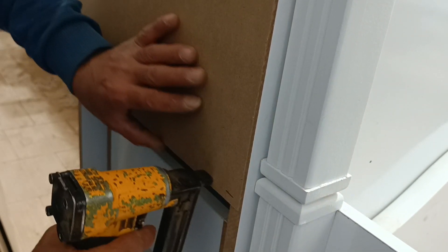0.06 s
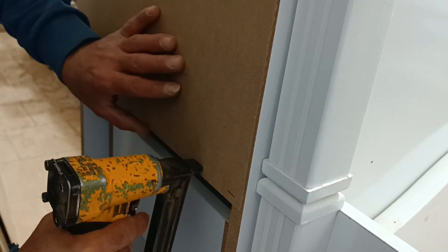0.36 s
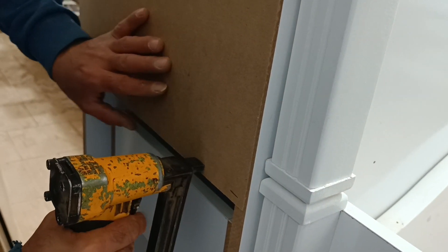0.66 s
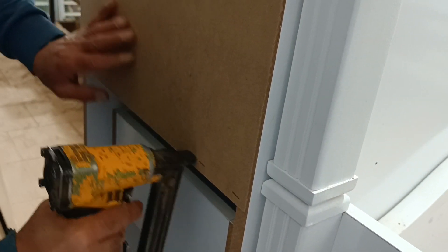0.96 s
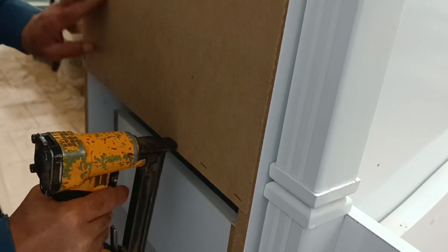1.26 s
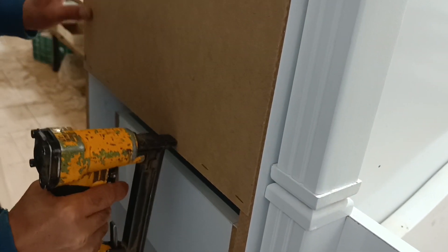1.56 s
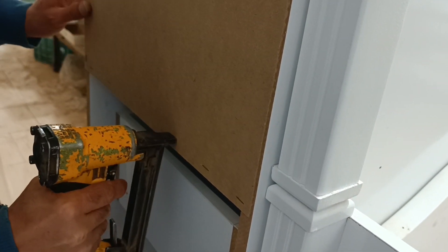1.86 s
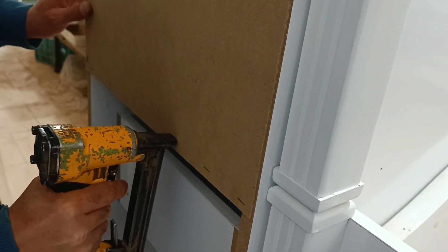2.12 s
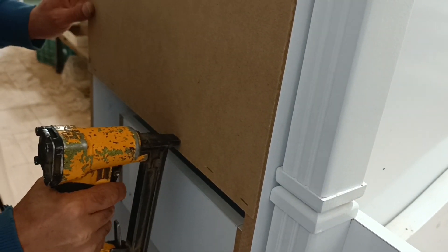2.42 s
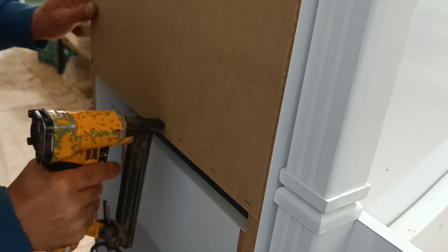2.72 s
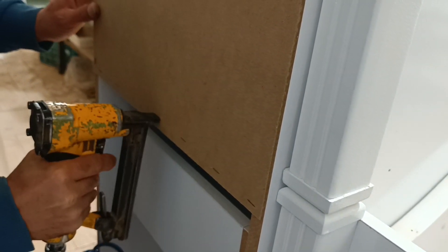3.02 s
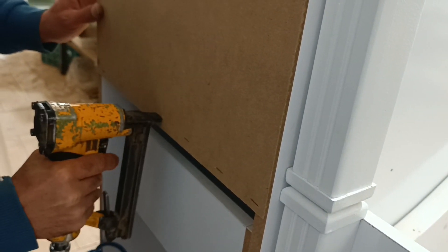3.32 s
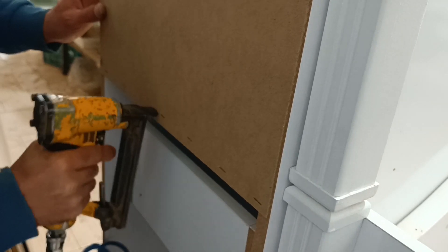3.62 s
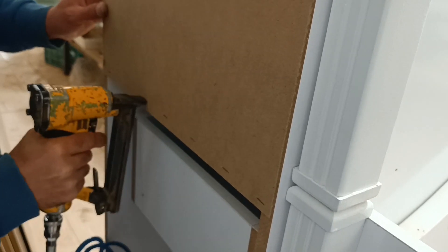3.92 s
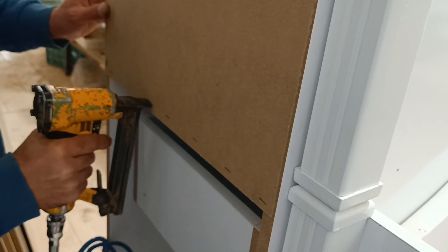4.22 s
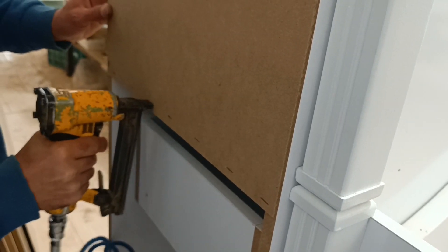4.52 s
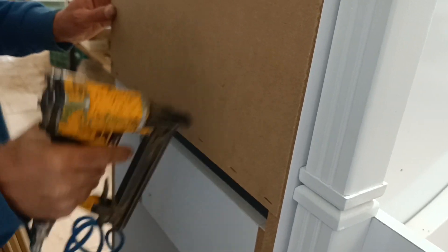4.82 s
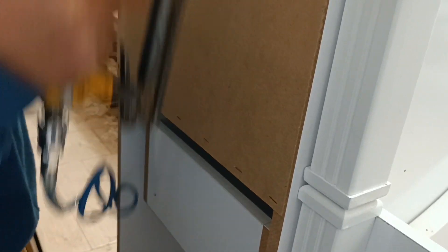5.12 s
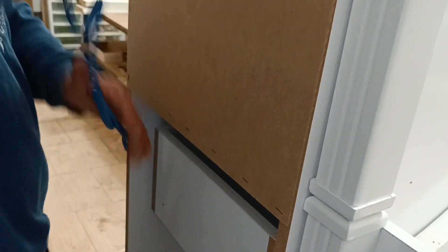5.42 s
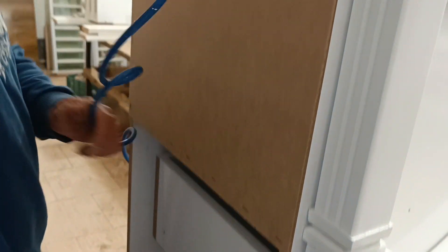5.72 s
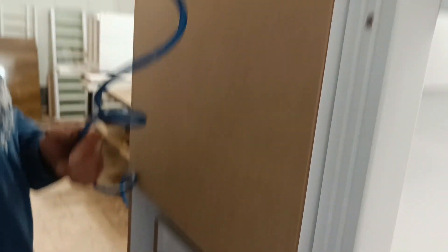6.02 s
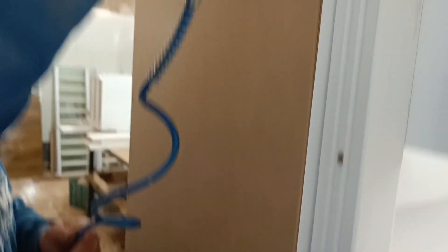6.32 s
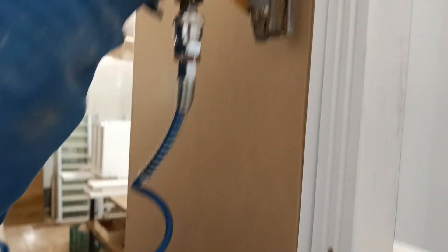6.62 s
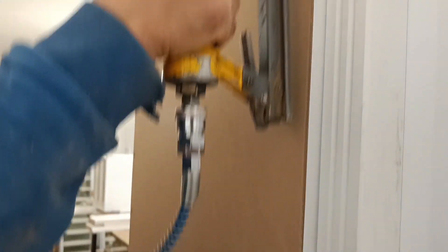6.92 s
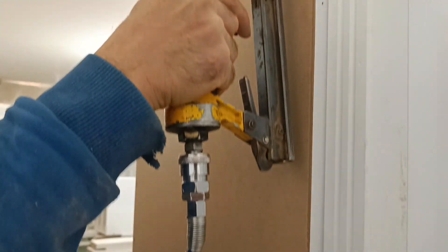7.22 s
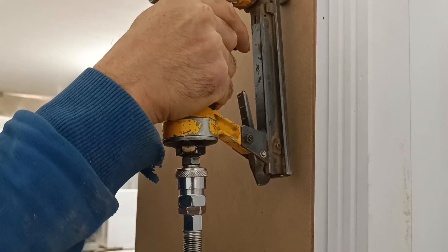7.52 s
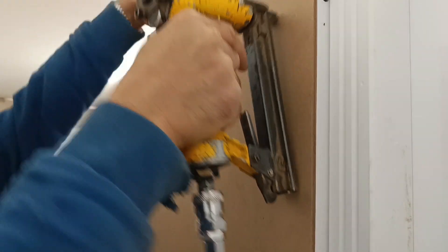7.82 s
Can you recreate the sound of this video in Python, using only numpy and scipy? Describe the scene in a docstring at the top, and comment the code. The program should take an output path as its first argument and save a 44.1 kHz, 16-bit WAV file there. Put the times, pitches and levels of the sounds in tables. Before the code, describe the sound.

Loud pneumatic staple shots with puffs of exhaust in a workshop, while a compressor hums, then cuts out with a long hiss.

```python
"""An air stapler fixes a thin back board to a cabinet: valve hiss, piston drive, strike, exhaust.
Behind it a piston compressor drones in the workshop, cuts out and blows off its line.
Palm and sleeve rub the board; the stapler clacks and bumps as it is moved and set down.
A limiter clamps on every shot, so the drone vanishes and swells back over half a second."""
import sys
import numpy as np
from scipy import signal
from scipy.fft import rfft, irfft, next_fast_len
from scipy.io import wavfile
from scipy.ndimage import uniform_filter1d, minimum_filter1d

SR = 44100
rng = np.random.default_rng(int(sys.argv[2]) if len(sys.argv) > 2 else 0)


def transcribe(signal):
    """Save signal, clipped to [-1, 1], as a 16-bit WAV file at the path in sys.argv[1]."""
    frames = np.atleast_2d(signal).T
    limited = np.clip(frames, -1, 1)
    pcm = np.round(limited * 32767).astype(np.int16)
    wavfile.write(sys.argv[1], SR, pcm)


N = 355446
TIME = np.arange(N) / SR

# board and cabinet modes: (frequency [Hz], level [dB], t60 [s])
BOARD_MODES = [(103, -9, .25), (152, 0, .2), (178, -8, .12), (237, -3, .14), (296, -4, .14), (355, -5, .13),
               (431, -10, .1), (560, -10, .1), (824, -14, .08)]
# likeness of the two microphone ports: (frequency [Hz], coherence [0..1])
PORT_COHERENCE = [(60, 0.99), (130, 1), (300, 1), (650, 0.41), (1400, 0.0054), (16000, 0.077)]


def amp(db):
    """Decibels to gain."""
    return 10 ** (np.asarray(db) / 20)


def unit_rms(x):
    """Scale to rms 1."""
    return x / np.sqrt(np.mean(x ** 2) + 1e-20)


def curve(points, hz):
    """Interpolate a table over log frequency."""
    f, value = np.transpose(points)
    return np.interp(np.log(hz + 1), np.log(f + 1), value)


def pan(db):
    """Constant-power gains for a left-minus-right level."""
    ratio = amp(np.atleast_1d(db))
    return np.array([ratio, np.ones_like(ratio)]) * np.sqrt(2 / (1 + ratio ** 2))


def add(mix, at_s, sound):
    """Mix in at at_s, cropped to the mix."""
    start = round(at_s * SR)
    sound = sound[:, max(-start, 0):]
    part = mix[:, max(start, 0):][:, :sound.shape[1]]
    part += sound[:, :part.shape[1]]


def noise(colour, size, low_pan_db=0, high_pan_db=0, right_lag_s=0.000375):
    """Coloured stereo noise, coherent in the bass."""
    padded = next_fast_len(size)
    hz = np.fft.rfftfreq(padded, 1 / SR)
    a, b = rfft(rng.standard_normal((2, padded)))
    coherence = curve(PORT_COHERENCE, hz)
    lag = np.exp(-2j * np.pi * hz * right_lag_s)
    pair = np.array([a, coherence * lag * a + np.sqrt(1 - coherence ** 2) * b])
    lean = pan(curve([(2000, low_pan_db), (6000, high_pan_db)], hz))
    return unit_rms(irfft(pair * lean * amp(curve(colour, hz)), padded)[:, :size])


def puff(t, hold_s, t60_s, rise_s=0.0005):
    """Envelope: ramps from t = 0, decays from hold_s."""
    return np.clip(t / rise_s, 0, 1) * amp(-60 * np.maximum(t - hold_s, 0) / t60_s)


def ring(modes, t, spread_rad, rise_s=0.00022):
    """Modes struck at t = 0, detuned per blow, phase scattered between ports."""
    out = 0
    for hz, db, t60_s in modes:
        detuned_hz = hz * rng.uniform(.994, 1.006)
        phase = 2 * np.pi * rng.random() + spread_rad * rng.standard_normal((2, 1))
        out += amp(db) * puff(t, 0, t60_s, rise_s) * np.sin(2 * np.pi * detuned_hz * t + phase)
    return out


def room(x, wet_db, taps_per_s=4000):
    """Add workshop echo: sparse reflections, decaying per band."""
    decay = [(100, 0.71), (400, 0.6), (1000, 0.81), (2200, 0.87), (4500, 0.55), (8000, 0.37), (15000, 0.15)]  # (frequency [Hz], t60 [s])
    tone = [(100, 15.5), (350, 8.5), (1000, -3.5), (2200, 1), (4000, 1.5), (7000, 4.5), (15000, 11)]  # (frequency [Hz], level [dB])
    taps = rng.choice([-1., 1.], (2, SR)) * (rng.random((2, SR)) < taps_per_s / SR)
    taps[:, :round(.005 * SR)] = 0
    hz, t, bands = signal.stft(taps, SR, nperseg=256)
    hz = hz[:, None]
    coherence = curve(PORT_COHERENCE, hz)
    bands[1] = coherence * bands[0] + np.sqrt(1 - coherence ** 2) * bands[1]
    bands *= amp(curve(tone, hz) - 60 * t / curve(decay, hz))
    response = signal.istft(bands, SR, nperseg=256)[1]
    response *= amp(wet_db) / np.linalg.norm(response[0])
    response[:, 0] += 1  # direct path
    return signal.fftconvolve(x, response, axes=1)


def workshop():
    """Steady, bass-heavy noise floor."""
    colour = [(20, -30), (48, -29), (70, 4.5), (100, -10.5), (160, -1.5), (260, -2), (430, -5.5), (720, -8),
              (1100, -9.5), (2000, -12.5), (5000, -23), (16000, -44.5)]  # (frequency [Hz], density [dB])
    return amp(-43) * noise(colour, N)


def intake_gain(hz, width_hz=4.16):
    """Stereo gain of the compressor intake's narrow resonances."""
    resonances = [(631, -49.5, -3), (664, -37.2, -3), (699, -38, 4), (719, -42.5, -1), (744, -37.8, -2),
                  (767, -33.5, 3), (778, -35.5, -1), (802, -38.5, 2), (826, -37, 7), (891, -41, 12),
                  (927, -49.5, 6), (985, -55, -3)]  # (frequency [Hz], level [dB], left-right [dB])
    power = 0
    for centre_hz, db, pan_db in resonances:
        power += (amp(db) * pan(pan_db)) ** 2 / (1 + (2 * (hz - centre_hz) / width_hz) ** 2)
    return np.sqrt(power)


def compressor(stroke_hz=11.449, throb_db=1.5, cut_out_s=4.28, coast_s=1.46):
    """Each piston stroke repeats one clatter and intake ring; all fades after cut-out."""
    # piston clatter, air rush: (frequency [Hz], density [dB])
    clatter_colour = [(25, -27), (48, -25), (70, -3.5), (110, -18.5), (160, 2), (220, -1), (340, -6),
                      (470, 1), (560, -30), (1100, -19.5), (1700, -9.5), (2300, -44)]
    rush_colour = [(40, -9), (200, -21), (500, -1), (1150, -16), (1700, 1.5), (2300, -3.5), (3900, -3),
                   (5000, -14.5), (6500, -41), (8200, -17), (10000, -39), (16000, -39)]
    size = 4096  # points per stroke
    turn = np.arange(size) / size
    hz = np.arange(size // 2 + 1) * stroke_hz
    # adjacent harmonics stay partly in phase: flutter at the stroke rate
    phase = np.cumsum(1.8 * rng.standard_normal(len(hz)))
    phase = phase + 0.58 * rng.standard_normal((2, len(hz)))
    intake = amp(1.87) * irfft(intake_gain(hz) * np.exp(1j * phase)) * size / np.sqrt(2)
    harmonics = amp(curve(clatter_colour, hz)) * rng.rayleigh(size=len(hz))
    harmonics *= (hz < 2500) * np.clip(hz / 95, 0, 1) ** 2
    clatter = unit_rms(irfft(harmonics * np.exp(1j * phase + 2j * np.pi * rng.random(len(hz)))))
    stroke = intake * amp(throb_db * np.cos(2 * np.pi * turn)) + amp(-40.5) * clatter
    machine = np.array([np.interp(stroke_hz * TIME, turn, side, period=1) for side in stroke])
    # turbulence rings the same resonances, so strokes differ
    padded = next_fast_len(N)
    air = rfft(noise(rush_colour, N), padded)
    turbulence = irfft(air * intake_gain(np.fft.rfftfreq(padded, 1 / SR)), padded)[:, :N]
    machine += amp(-42) * unit_rms(turbulence)
    # only the strongest intake ring lingers while coasting
    core = signal.sosfilt(signal.butter(2, [740, 830], "band", fs=SR, output="sos"), machine)
    coasting = np.clip((TIME - 4.5) / .2, 0, 1)
    machine = (1 - coasting) * machine + coasting * amp(-1) * core
    effort = np.clip(1 - (TIME - cut_out_s) / coast_s, 0, 1) ** 2.15
    return effort * (machine + amp(-40.5) * noise(rush_colour, N))


def blow_off(open_s=4.285, rise_s=0.086, bleed_db_per_s=2.5):
    """A valve vents the line; the hiss weakens as pressure falls."""
    colour = [(200, -12), (1200, -7.5), (2300, 0), (4000, 2.5), (5200, -2.5), (6500, -9), (8300, -4),
              (10000, -11.5), (13000, -15.5), (16000, -17)]  # (frequency [Hz], density [dB])
    t = np.maximum(TIME - open_s, 0)
    return np.clip(t / rise_s, 0, 1) * amp(-32 - bleed_db_per_s * t) * noise(colour, N)


def friction(strokes, colour, rise_s, t60_s):
    """Sliding hiss: each stroke swells, holds, fades."""
    envelope = sum(amp(db) * puff(TIME - at_s, hold_s, t60_s, rise_s) for at_s, hold_s, db in strokes)
    return envelope * noise(colour, N)


def rubbing():
    """Palm and sleeve slide on the board; hose and clothes rustle as the stapler lifts."""
    # strokes: (time [s], length [s], level [dB])
    palm = [(-.3, 1.05, -50.5), (.9, 0.59, -43.5), (3.1, 0.42, -63), (4.1, .22, -52)]
    sleeve = [(6.0, 0.28, -47), (6.22, 0.18, -38.5), (7.31, .06, -37), (7.75, 0.35, -51)]
    rustle = [(4.9, 0.27, -36)]
    # friction spectra: (frequency [Hz], density [dB])
    skin_colour = [(1000, -18), (5000, -4), (9000, 0.5), (13000, -1), (16000, -1)]
    cloth_colour = [(300, -10), (1000, -6), (1800, 0), (2550, 2), (3100, -8), (4300, -27), (8000, -24)]
    rustle_colour = [(1500, -29), (2800, -2), (3700, 1), (4600, 0), (5600, -12), (9000, -46)]
    return (friction(palm, skin_colour, rise_s=.3, t60_s=.45)
            + friction(sleeve, cloth_colour, rise_s=.087, t60_s=.19)
            + friction(rustle, rustle_colour, rise_s=.068, t60_s=1.8))


def handling():
    """Bumps on the hand-damped board; clacks of the stapler's nose and magazine."""
    bumps = [(5.196, -33, 0.33), (5.44, -32, 0.28), (6.122, -25.5, 1), (6.142, -30.5, 0.69),
             (7.921, -22, 0.3), (7.986, -48, .4)]  # (time [s], level [dB], board ring [gain])
    clacks = [(6.062, -33, 0.15), (6.118, -43, 0.049), (6.14, -31, 0.2), (7.2111, -35.5, 0.22),
              (7.366, -34.5, 0.089), (7.7047, -25, 0.13), (7.7735, -34, 0.067), (7.788, -29.5, 0.1),
              (7.7974, -28, 0.15), (7.921, -44, 0.034), (8.01, -30.5, 0.074)]  # (time [s], level [dB], t60 [s])
    # impact spectra: (frequency [Hz], density [dB])
    thump_colour = [(50, -32), (100, -26), (145, 8), (190, -4.5), (330, -3), (420, -9.5), (750, -11),
                    (1500, -18.5), (3000, -19), (9000, -59)]
    clack_colour = [(200, -32), (1800, 0.5), (2700, 10), (4500, 6), (6500, -7), (8700, -1.5), (12000, -22),
                    (16000, -22)]
    out, size = np.zeros((2, N)), SR // 3
    t = np.arange(size) / SR
    for at_s, db, ring_gain in bumps:
        board = puff(t, 0, .2) * ring(BOARD_MODES, t, spread_rad=.5, rise_s=.004)
        thump = amp(-3.5) * puff(t, .0073, .19) * noise(thump_colour, size)
        add(out, at_s, amp(db) * (ring_gain * board + thump))
    for at_s, db, t60_s in clacks:
        add(out, at_s, amp(db) * puff(t, .0021, t60_s) * noise(clack_colour, size))
    # the bumps and clacks carry nothing below about 75 Hz
    low_cut = signal.butter(3, 75, "high", fs=SR, output="sos")
    return signal.sosfilt(low_cut, room(out, wet_db=-9)[:, :N])


def tick():
    """Sharp, dry tick beside the right port: two single-cycle pulses."""
    pulses = [(6.3917, -22, 1000), (6.394, -4.5, 1800)]  # (time [s], level [dB], frequency [Hz])
    out = np.zeros((2, N))
    for at_s, db, hz in pulses:
        phase = 2 * np.pi * hz * (TIME[:SR // 3] - 1 / hz)
        add(out, at_s - 1 / hz, amp(db) * pan(-14) * phase * np.exp((1 - phase ** 2) / 2))
    return out


def shot(valve_lead_s, drive_lead_s, release_s, exhaust_s, valve_db, drive_db, strike_db, exhaust_db):
    """One pneumatic cycle; the staple is driven home at t = 0."""
    body_modes = [(1290, -19, 0.052), (1403, 4, 0.042), (1570, -3, .07), (1715, 8.5, 0.017),
                  (1766, -2.5, 0.22), (2016, -8.5, 0.42), (2173, -3, 0.22), (2970, -19, 0.14),
                  (3400, -5, 0.062), (3780, 4.5, 0.094), (3970, -1, 0.066), (4400, 3, 0.13),
                  (5260, -5, .06)]  # body and nose: (frequency [Hz], level [dB], t60 [s])
    # stage spectra: (frequency [Hz], density [dB])
    valve_colour = [(100, -39), (1500, -11), (4000, -11.5), (7000, -2.5), (9500, -8), (12000, -7),
                    (16000, -3.5)]
    drive_colour = [(40, -91), (180, 6.5), (700, 1.5), (1600, -3.5), (2800, 1), (4500, 1), (6500, 1),
                    (9000, 0.5), (16000, -3)]
    strike_colour = [(40, -66), (200, -12), (900, -5), (1600, 4), (2300, -3), (3800, -2.5), (5200, -2),
                     (6500, -22), (8300, -7), (11000, -20.5), (16000, -50)]
    spill_colour = [(60, -40), (300, 2.5), (900, -6), (1700, 1.5), (2600, 3), (4000, 3.5), (6000, -8.5),
                    (9000, -13.5), (16000, -25)]
    exhaust_colour = [(30, -42), (90, -7), (220, 7), (900, 6.5), (2500, 6), (4300, 8), (5500, 2.5),
                      (7000, 4), (9000, 5), (13000, 2.5), (16000, 9.5)]
    size = SR * 2 // 5
    t = np.arange(size) / SR - valve_lead_s
    # trigger valve spits; head valve opens and air throws the piston
    valve = noise(valve_colour, size, low_pan_db=-30, high_pan_db=6)
    valve *= amp(valve_db - 3.5) * puff(t + valve_lead_s, .018, .055)
    drive = noise(drive_colour, size, low_pan_db=-9, high_pan_db=-8)
    drive *= amp(drive_db) * puff(t + drive_lead_s, .008, .1, rise_s=.004)
    # blade hits, piston rebounds on its bumper; body and board ring
    hit = puff(t, .0024, .031, rise_s=.0013)
    rebound = 1.1 * puff(t - .0062, .00076, .025)
    strike = (hit + rebound) * noise(strike_colour, size, low_pan_db=-3, high_pan_db=6.5)
    body = amp(-12) * ring(body_modes, t, spread_rad=1.2)
    board = amp(-22) * ring(BOARD_MODES, t, spread_rad=.9, rise_s=.00067)
    # a short jet, then air spills past the piston
    jet = amp(-10) * puff(t, .019, .047, rise_s=.0017) * noise(valve_colour, size, high_pan_db=-1)
    spill = amp(-7.5) * puff(t, .012, .34, rise_s=.023) * noise(spill_colour, size)
    firing = amp(strike_db) * (drive + strike + body + board + jet + spill)
    # trigger released: a leak builds, then the cylinder dumps its air
    leak = amp(-9) * puff(t - release_s + .016, .013, .012, rise_s=.013) * noise(valve_colour, size)
    dump = noise(exhaust_colour, size, low_pan_db=2, high_pan_db=-5.5)
    dump *= amp(2.5) * puff(t - release_s, exhaust_s, .093, rise_s=.0048)
    return valve + firing + amp(exhaust_db) * (leak + dump)


def stapler():
    """Shots with room echo; the first strikes before time zero."""
    # (strike time [s], valve lead [s], drive lead [s], exhaust delay [s], exhaust length [s],
    #  valve [dB], drive re strike [dB], strike [dB], exhaust [dB])
    shots = [(-.26, .024, .019, 0.066, 0.015, -20, -15, 15.5, 10),
             (0.764, 0.03, 0.018, 0.069, 0.0073, -16, -13.5, 15.5, 12),
             (2.5137, 0.027, .017, 0.079, 0.01, -22, -15, 15.5, 12.5),
             (3.5173, 0.023, 0.015, 0.086, 0.0076, -15.5, -8, 14, 13),
             (4.4927, .026, 0.015, 0.0832, 0.014, -15, -12, 10.5, 6.5),
             (6.635, 0.017, 0.013, 0.11, 0.025, -14, -6.5, 13, 7.5)]
    out = np.zeros((2, N))
    for strike_s, valve_lead_s, *settings in shots:
        add(out, strike_s - valve_lead_s, room(shot(valve_lead_s, *settings), wet_db=-12))
    return out


def scene():
    """Stapler and handling over compressor and workshop noise."""
    return compressor() + handling() + tick() + workshop() + blow_off() + rubbing() + stapler()


def limiter(x, threshold_db=-17.5, slope=0.79, recovery_db_per_s=56, initial_peak_db=2,
            ahead_s=0.0005, window_s=0.0071):
    """Look-ahead soft-knee limiter: fast clamp, slow recovery; starts clamped."""
    power = uniform_filter1d((x ** 2).mean(0), round(window_s * SR))
    power_db = 10 * np.log10(abs(power) + 1e-12)
    ahead = round(ahead_s * SR)
    coming_db = -minimum_filter1d(-power_db, 2 * ahead)
    fall_db = recovery_db_per_s * TIME
    peak_db = np.maximum(np.maximum.accumulate(coming_db + fall_db), initial_peak_db) - fall_db
    cut_db = slope * 10 * np.log10(1 + amp(peak_db - threshold_db) ** 2)
    return x * amp(-uniform_filter1d(cut_db, ahead))


def record(dry, cutoff_hz=15950):
    """Two unlike microphone ports, limiter, hard clipping, low-pass."""
    port_balance = [(100, 0.5), (1500, -1.5), (2800, -4), (4000, -7), (5200, -3.5), (6800, 17.5),
                    (8200, 16.5), (10000, 12), (12800, 4), (15000, 14)]  # (frequency [Hz], left-right [dB])
    size = next_fast_len(N + SR // 10)
    hz = np.fft.rfftfreq(size, 1 / SR)
    heard = irfft(rfft(dry, size) * pan(curve(port_balance, hz)), size)[:, :N]
    low_pass = signal.firwin(401, cutoff_hz, window=("kaiser", 8), fs=SR)
    return signal.oaconvolve(np.clip(limiter(heard), -.88, .88), low_pass[None], "same")


dry = scene()
out = record(dry)
transcribe(out)
```